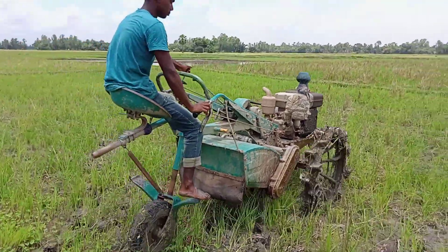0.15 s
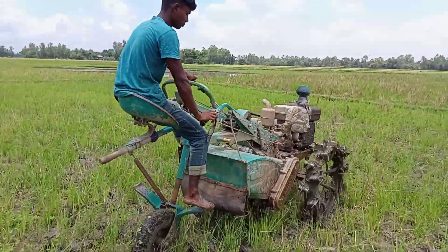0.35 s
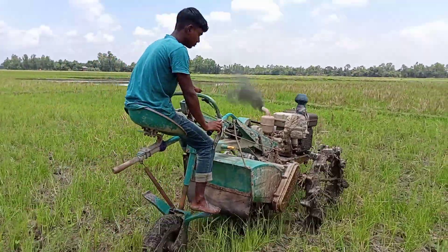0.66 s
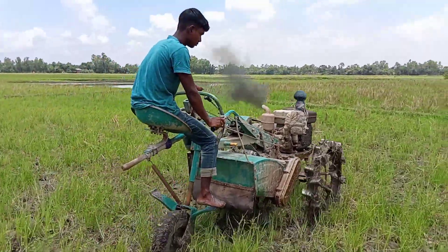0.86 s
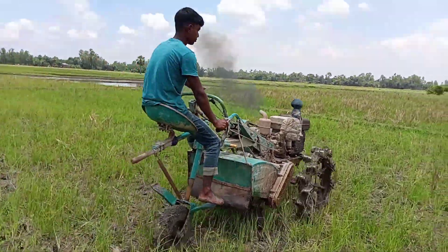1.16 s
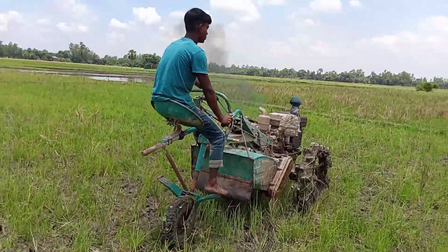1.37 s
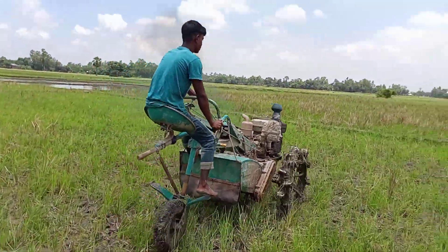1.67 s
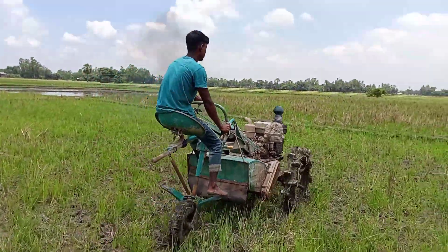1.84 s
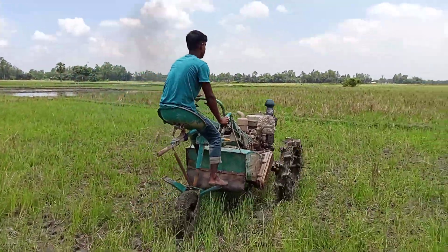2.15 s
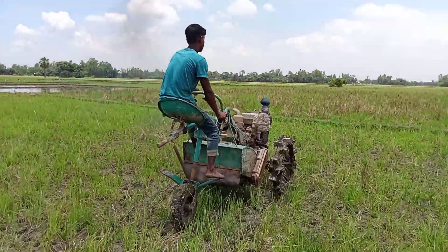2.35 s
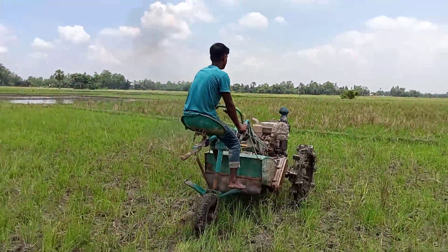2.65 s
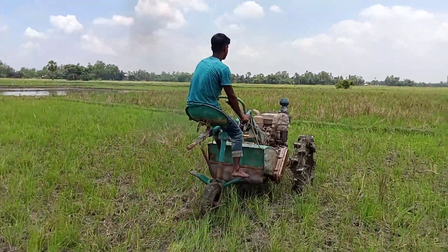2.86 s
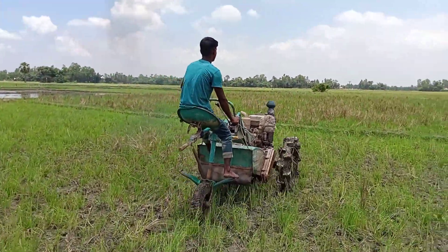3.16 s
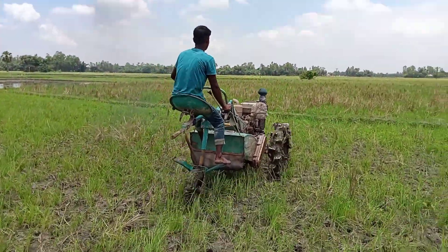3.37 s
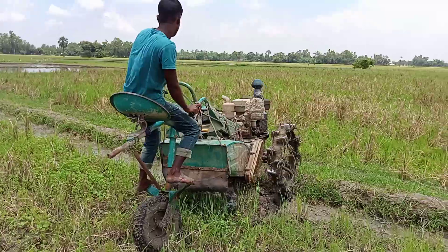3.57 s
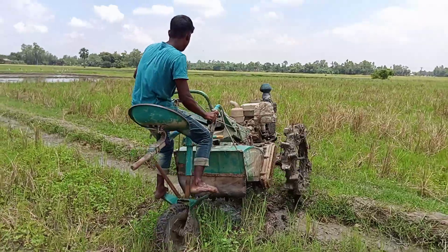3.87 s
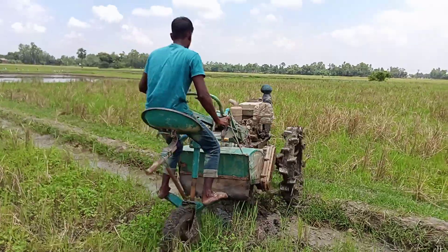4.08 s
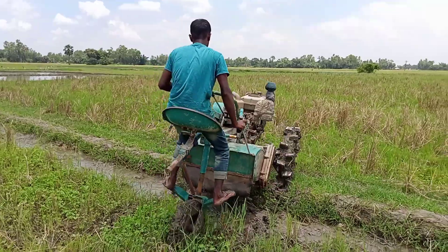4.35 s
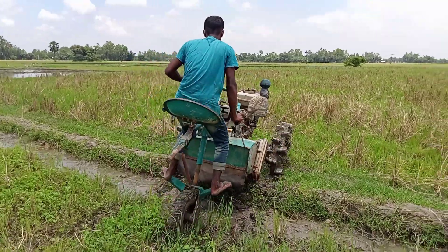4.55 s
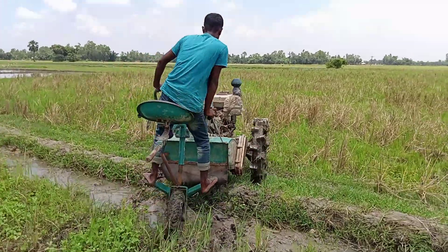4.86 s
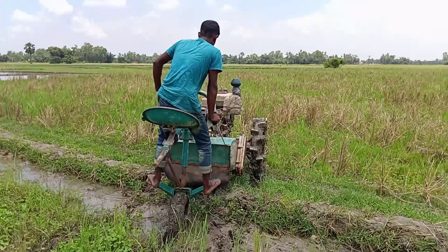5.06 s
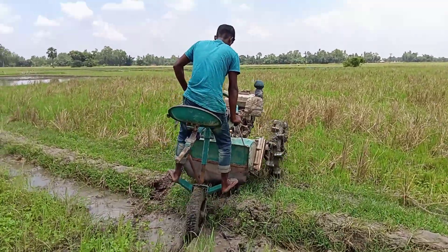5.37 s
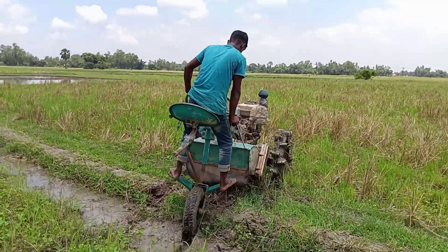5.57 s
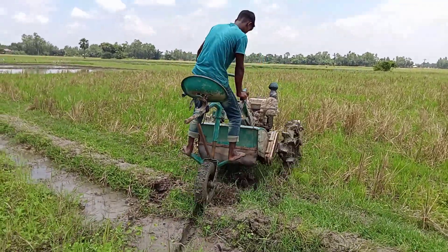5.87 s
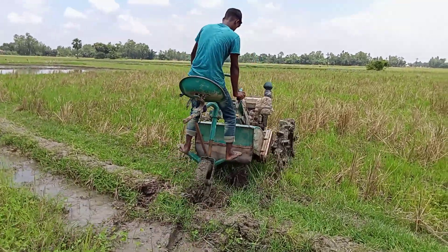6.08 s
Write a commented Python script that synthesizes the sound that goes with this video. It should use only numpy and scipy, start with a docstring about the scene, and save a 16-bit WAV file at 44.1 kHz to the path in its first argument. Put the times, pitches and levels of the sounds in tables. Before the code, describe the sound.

Outdoors on farmland, a diesel tiller chugs rapidly with barking exhaust, bright combustion cracks, valve clicks and lumpy metal clatter. A few early firings leave fuller hollow notes in the pipe. The noise softens as the machine is heard from behind, cuts to nothing halfway, and returns as a slower, heavier chug with uneven knocks and less rattle. Dry, close, mono sound from a small handheld-type microphone with thin deep bass.

```python
"""A single-cylinder diesel tiller chugs away, about ten firings a second, then about eight.
Each firing thumps in the exhaust pipe as decaying sine tones and knocks in the block as a noisy shudder
that rings its tones. Noise bursts make the cracks and clicks of firings and valve gear, and shaped noise
makes the rattle of panels and gears, which ebbs late in the cycle, and the rumble of exhaust flow.
The sound cuts out for a quarter second midway."""
import sys
import numpy as np
from scipy import signal
from scipy.fft import rfft, irfft, next_fast_len
from scipy.io import wavfile
from scipy.ndimage import uniform_filter1d, minimum_filter1d, map_coordinates

SR = 44100
rng = np.random.default_rng(int(sys.argv[2]) if len(sys.argv) > 2 else 0)


def dump_mix(stems):
    """Bounce the given channels to the path in sys.argv[1] as a 16-bit WAV at rate SR."""
    frames = np.atleast_2d(stems).T  # one column per channel
    limited = np.clip(frames, -1, 1)  # hard clip at full scale
    pcm = np.round(limited * 32767).astype(np.int16)
    wavfile.write(sys.argv[1], SR, pcm)


N = 274302
LEAD = SR // 4  # samples kept before the start, for cycles already under way

# How the engine runs. Each row: time in seconds, base rattle level in dB, base exhaust thump level in dB,
# hardness of combustion in dB, view (0 side, 1 rear, 2 and above far rear), rumble over the rattle in dB,
# bark of the upper pipe tones in dB.
RUNNING = [(0, -19.5, -25, -3.5, 0.49, -15, 9.5), (.35, -19, -29, -9.5, 0.26, -16, 17),
           (.5, -17, -28.5, 0.5, 0.19, -12, 8), (1.1, -17, -21, -0.5, 0.14, -14, 10),
           (1.2, -18, -25, -15.5, 0.21, -8.5, 8), (1.7, -19, -25.5, -13, 0.358, -12, 0),
           (2.4, -22, -26.5, -18, 0.17, -9, -0.5), (3.2, -21, -26, -15, 0.22, -6, -10),
           (3.469, -21.5, -24.5, -27, 0.75, -11, -3.5), (4.2, -22, -22, -12, 1.37, -10, -4),
           (4.6, -25.5, -27.5, -23, 1.04, -7.5, 6), (5, -25, -24, -20, 1.07, -6.5, -8),
           (5.6, -24.5, -25.5, -15, 1.65, -18.5, 8.5), (5.9, -23.5, -23, -13.5, 1.93, -5.5, -9),
           (6.22, -26.5, -23, -12, 2.9, -9, -1)]
# Engine speed, one list before the cut and one after, each from its first firing.
# Each row: time in seconds, firings per second.
SPEED = [
    [(-.0345, 8.8), (.3, 9.04), (.6, 9.731), (1.25, 11.102), (1.9, 10.688), (2.5, 10.374), (3.23, 10.18)],
    [(3.406, 8.31), (3.45, 8.31), (4.2, 8.14), (4.6, 8.21), (5.3, 8.4), (5.8, 8.03), (6.26, 8.13)],
]
# Single firings that come harder than their neighbours. Each row: time in seconds, extra hardness in dB.
HARD_FIRINGS = [(1.474, 6.5), (2.311, 9), (2.408, 8.5), (2.793, 6), (2.891, 9.5), (3.889, 5), (4.012, 6.5),
                (4.987, 9), (5.226, 7), (5.71, 4.5), (6.081, 7)]

# Tones of the exhaust pipe. Each row: pitch in Hz, relative level in dB, time to fade by 60 dB in seconds,
# share of the bark from 0 to 1.
PIPE = [(81, 2, 0.083, 0.1), (99.6, -2.5, 0.066, 0), (114.5, -11, 0.1, 0.4), (146, -2.5, 0.1, 0.7),
        (209.3, -6.5, 0.11, 0.97), (279, -5, 0.033, 0.5)]
# Firings that sound one fuller note in the pipe. Each row: start in seconds, starting pitch in Hz, level in dB.
NOTES = [(0.919, 150, -19.5), (1.199, 150, -14), (1.379, 210.7, -17), (1.745, 204, -16), (1.865, 132, -18)]
PIPE_GAIN_DB, PUFF_DB = 5.5, -9.5  # added to every thump; second puff over the thump
NOTE_T60_S, NOTE_RISE = 0.24, 0.11  # fade by 60 dB; a note climbs by this share in that time

# Tones of the engine block and covers when knocked. Each row: pitch in Hz, relative level in dB from the side,
# from the rear, from the far rear, time to fade by 60 dB in seconds.
BLOCK = [(894, -24, 5, -5, 0.083), (1026, -18, -2, -9, 0.11), (1823, -4, 2, 4, 0.036),
         (2299, 5.5, 4, -22, 0.037), (2730, 6.5, 5.5, 6.5, 0.025), (3090, 10.5, -8, 21, 0.023),
         (3214, -1, 3.5, 6, 0.04), (3440, 0.5, 10.5, -23, 0.035), (3787, -6.5, -6.5, 6.5, 0.055),
         (4330, -12, -26, -19, 0.018)]
# Clicks and knocks of each cycle: the firing's own click first, then the valve gear. Each row: share of the
# cycle, relative click level in dB from the side, from behind, relative knock level in dB.
CYCLE_CLICKS = [(.01, -2.5, 6.5, -22.5), (.27, 3, 4, -7.5), (0.549, 1, 1.5, -12), (.79, -1.5, -6.5, 0.5)]
# Single louder clanks of loose parts. Each row: time in seconds, # knock level in dB.
LOUD_KNOCKS = [(1.1787, -9.5), (1.2241, -12), (3.5009, -12), (4.8404, -13.5), (5.8545, -10),
               (5.9797, -11.5), (6.1017, -19), (6.1833, -16)]
# Colour of the combustion crack. Each row: pitch in Hz, relative level in dB per Hz.
CRACK = [(3500, -23), (5450, -11.5), (7500, -0.5), (8400, -8.5), (9800, -34)]
# Colour of the top edge of a hard crack. Each row: pitch in Hz, relative level in dB per Hz.
FIZZ = [(7000, -14.5), (9000, -2), (10200, -15), (11500, -6.5), (12600, -10.5), (14500, -8.5)]
# Colour of the treble in each cycle's clicks. Each row: pitch in Hz, relative level in dB per Hz.
CLICK = [(3500, -10.5), (5200, 0), (7300, 2.5), (8600, -6.5), (10300, -19.5), (12300, -17), (14000, -8)]
CRACK_DB, KNOCK_DB = -31, -1.5  # strength when the hardness is 0 dB
KNOCK_FOLLOWS, CLICK_FOLLOWS = 0.54, 0.24  # knock and click dB per dB of hardness
THUMP_SCATTER_DB, HARDNESS_SCATTER_DB, KNOCK_SCATTER_DB = 0.5, 2, 0.47  # from firing to firing
LATE_KNOCK_S = .006  # the knock comes this much later at full hardness
TAP_DB = 9  # added to every knock of the CYCLE_CLICKS rows
# The next three each hold a side, rear and far rear value:
CLICK_DB = -21, -14, -29  # base level of the clicks over the rattle
REBOUND_DB = 5.5, 5, 11  # base level of the rebound over the rattle
REBOUND_S = .024, .02, 0.018  # rebound after the firing

# Swell over one cycle. Each row: share of the cycle, rattle swell in dB before its depth is applied,
# rumble swell in dB.
SWELL = [(0, -3.5, 5), (.15, -2, 3), (.3, -1, 3.5), (.6, -3, 1), (.76, -3.5, 0), (.82, -2, 4), (.93, 0, 3),
         (1, -1, 3)]
# Ringing of casing and panels. Each row: pitch in Hz, width in Hz, strength in dB against the broad colour
# from the side, from the rear, from the far rear.
CASING = [(761, 13, -3, -1, -11), (2744, 51, -1.5, -35, -27), (7260, 250, -9.5, -9, -2)]
# Metal heard from the side. Each row: pitch in Hz, relative level in dB per Hz.
SIDE_VIEW = [(250, -24), (455, -0.5), (870, 0.5), (1300, -3), (2000, -3.5), (3240, 1), (4600, -11.5),
             (5430, -35), (7400, -30.5), (10000, -53), (12600, -75.5), (14500, -44)]
# Metal heard from behind. Each row: pitch in Hz, relative level in dB per Hz.
REAR_VIEW = [(250, -2.5), (420, -2), (1000, 3), (1560, -5), (2900, -4), (3350, 1.5), (4500, -16.5),
             (5150, -25), (7100, -23), (9700, -49), (12300, -40), (13800, -45.5)]
# Metal heard from further behind. Each row: pitch in Hz, relative level in dB per Hz.
FAR_VIEW = [(250, -20), (700, -5), (1430, -12), (2740, -12), (3130, -7.5), (4500, -22), (5160, -34.5),
            (7200, -34.5), (9500, -49.5), (12300, -46.5), (14000, -45)]
# A hollow panel that rings with the rattle. Each row: time in seconds, level over the rattle in dB.
HOLLOW = [(0, -7), (.5, -18.5), (.9, -15.5), (1.15, -17), (1.7, -16.5), (2.5, -14.5), (2.7, -14),
          (3.2, -15), (3.75, -15), (4.1, -18), (4.8, -12.5), (6.22, -23)]
# A cover plate that rings with the rattle. Each row: time in seconds, centre pitch in Hz,
# level over the rattle in dB.
PLATE = [(0, 3010, -2), (1.1, 3270, -14), (3.2, 3250, -18), (3.5, 3410, -11), (4.4, 3315, -3.5),
         (4.7, 3340, -8.5), (5.4, 3300, -5), (6.22, 3090, -6)]
SWELL_DEPTH = 0.98, 1.25, 1.23  # depth of the rattle's swell from the side, rear and far rear
HARD_SWELL = 0.79  # added to that depth at full hardness
HOLLOW_HZ, HOLLOW_WIDTH_HZ = 882, 24
PLATE_WIDTH_HZ, PLATE_SWELLS = 330, 2.9  # plate swell in dB per dB of rattle swell
TREBLE_HZ, TREBLE_SWELLS = 4760, 0.92  # above this the rattle swells further, dB per dB

# Colour of exhaust flow and frame shake. Each row: pitch in Hz, relative level in dB per Hz.
RUMBLE = [(40, -30), (70, -15.5), (114, 4), (150, 1.5), (180, -6.5), (218, 3), (273, -8), (325, -1.5),
          (420, -13), (650, -27), (1100, -120)]
BARK_HZ, FLOW_BARKS = 179.5, 0.55  # the flow above this follows the bark, dB per dB

MIC_HZ, TOP_HZ = 60.9, 15450  # bass edge of the microphone; top of the treble
SILENCE_FROM_S, SILENCE_TO_S = 3.2066, 3.4648


def amp(db):
    """Turn decibels into a plain factor."""
    return 10 ** (np.asarray(db) / 20)


def unit(x):
    """Scale x to an average strength (RMS) of one."""
    return x / np.sqrt(np.mean(x ** 2) + 1e-20)


def along(points, hz):
    """Read a curve of (Hz, value) points on a log pitch axis."""
    f, v = np.transpose(points)
    return np.interp(np.log(hz + 1), np.log(f + 1), v)


def curves(rows, at):
    """Read each column after the first at the given places."""
    place, *columns = np.transpose(rows)
    return [np.interp(at, place, column) for column in columns]


def wobble(rate):
    """A smooth random curve with this many random points a second."""
    points = rng.standard_normal(int(N * rate / SR) + 4)
    return map_coordinates(points, [np.arange(N) * rate / SR])


def coloured(x, gain):
    """Filter x by a gain of frequency, scaled to keep the power of white noise."""
    m = next_fast_len(N + 8192)
    g = gain(np.fft.rfftfreq(m, 1 / SR))
    return irfft(rfft(x, m) * unit(g), m)[:N]


def patchy(x, depth_db, bins, frames):
    """Give x random patches of gain: other parts ring up from moment to moment."""
    z = signal.stft(x, nperseg=1024)[2]
    field = uniform_filter1d(rng.standard_normal(z.shape), size=bins, axis=0)
    field = uniform_filter1d(field, size=frames, axis=1)
    return signal.istft(z * unit(amp(depth_db * unit(field))), nperseg=1024)[1][:N]


def views(turn):
    """Blending weights of the side, rear and far rear views."""
    return np.clip(1 - np.abs(np.clip(turn, 0, 2) - np.arange(3)[:, None]), 0, 1)


def cycles():
    """Add up engine speed to get each cycle's start and length, and the share passed at each sample."""
    start = []
    for rows in SPEED:
        t = np.arange(rows[0][0], rows[-1][0], 1 / SR)
        turned = np.cumsum(curves(rows, t)[0]) / SR
        firings = np.arange(int(turned[-1]) + 1)
        start = np.append(start, np.interp(firings, turned, t))
    gap = np.diff(start)
    # the shortest of neighbouring gaps
    length = minimum_filter1d(np.append(gap, gap[-1]), size=3)
    now = np.arange(N) / SR
    k = np.searchsorted(start, now, "right") - 1
    return start, length, np.minimum((now - start[k]) / length[k], 1)


def exhaust():
    """Each firing, and a weaker puff a third of a cycle later, rings the pipe, suction first."""
    start, length, _ = cycles()
    _, thump_db, *_, bark_db = curves(RUNNING, start)
    thump_db = thump_db + THUMP_SCATTER_DB * rng.standard_normal(len(start))
    out, t = np.zeros(N + 3 * LEAD), np.arange(LEAD) / SR
    onset = 1 - np.exp(-t / 0.0016)
    for s, cycle, first_db, bark in zip(start, length, thump_db, bark_db):
        for when, db in (s, first_db), (s + .34 * cycle, first_db + PUFF_DB):
            ring = 0
            for hz, level_db, t60, share in PIPE:
                tone_db = level_db + share * (bark + rng.normal(0, 0.89))
                ring = ring + amp(tone_db - 60 * t / t60) * np.sin(2 * np.pi * hz * t)
            out[round(when * SR) + LEAD:][:LEAD] -= amp(db + PIPE_GAIN_DB) * ring * onset
    return out[LEAD:LEAD + N]


def notes():
    """Some firings leave a fuller, slightly climbing note in the pipe."""
    out, t = np.zeros(N), np.arange(LEAD) / SR
    for s, hz, db in NOTES:
        pitch = hz * (1 + NOTE_RISE * t / NOTE_T60_S)
        envelope = amp(db - 60 * t / NOTE_T60_S) * (1 - np.exp(-t / 0.0066))
        out[round(s * SR):][:LEAD] -= envelope * np.sin(2 * np.pi * np.cumsum(pitch) / SR)
    return out


def knocks(times, dbs, t60, rise):
    """Each knock is a short noisy shudder that rings the block's tones at new strengths."""
    out, t = np.zeros(N + 3 * LEAD), np.arange(SR // 10) / SR
    hz, *view_db, decay = np.transpose(BLOCK)
    turn = curves(RUNNING, times)[3]
    levels = views(turn).T @ view_db + 2 * rng.standard_normal((len(times), len(hz)))
    modes = amp(-60 * t / decay[:, None]) * np.sin(2 * np.pi * hz[:, None] * t)
    envelope = amp(-60 * t / t60) * (1 - np.exp(-t / rise))
    for s, db, level in zip(times, dbs, levels):
        ring = amp(level) @ modes
        shudder = envelope * rng.standard_normal(len(t))
        knock = signal.fftconvolve(shudder, ring / np.linalg.norm(ring))
        out[round(s * SR) + LEAD:][:len(knock)] += amp(db) * knock
    # the knocks fall silent above about 4.9 kHz
    return signal.sosfilt(signal.butter(8, 4900, fs=SR, output="sos"), out[LEAD:LEAD + N])


def bursts(times, dbs, t60, rise, colour):
    """Coloured noise under one quick rise and decay for each given time."""
    t = np.arange(SR // 10) / SR
    at = np.round(times * SR).astype(int) + LEAD
    hits = np.bincount(at, amp(dbs) ** 2, N + 2 * LEAD)
    shape = amp(-60 * t / t60) * (1 - np.exp(-t / rise))
    power = signal.fftconvolve(hits, shape ** 2)[LEAD:LEAD + N]
    noise = np.sqrt(np.abs(power)) * rng.standard_normal(N)
    return coloured(noise, lambda hz: amp(along(colour, hz)))


def combustion():
    """Each firing knocks the block, rebounds a moment later and cracks in the treble."""
    start = cycles()[0]
    rattle_db, _, hard_db, turn, *_ = curves(RUNNING, start)
    # full load fires evenly, softer running varies more
    unevenness = np.clip(.3 - hard_db / 10, 0, 1)
    chance = rng.standard_normal((len(start), 2)) * unevenness[:, None]
    hard_db = hard_db + HARDNESS_SCATTER_DB * chance[:, 0]
    for s, extra_db in HARD_FIRINGS:
        hard_db[np.argmin(np.abs(start - s))] += extra_db

    knock_at = start - .004 + LATE_KNOCK_S * np.minimum(amp(hard_db), 1)
    knock_db = KNOCK_DB + KNOCK_FOLLOWS * hard_db + KNOCK_SCATTER_DB * chance[:, 1]
    knock = knocks(knock_at, knock_db, t60=0.039, rise=0.0034)
    rebound_db = rattle_db + REBOUND_DB @ views(turn) + chance[:, 1]
    rebound = knocks(start + REBOUND_S @ views(turn), rebound_db, t60=0.054, rise=0.004)

    crack_db = CRACK_DB + hard_db
    crack = bursts(start - .001, crack_db, t60=0.12, rise=0.002, colour=CRACK)
    # a harder crack is brighter: its top edge grows twice as fast in dB
    fizz = bursts(start, 2 * crack_db + 29, t60=0.059, rise=.002, colour=FIZZ)
    return knock + rebound + crack + fizz


def cycle_clicks():
    """Clicks and knocks of each cycle: the firing's own click first, then the valve gear."""
    start, length, _ = cycles()
    rattle_db, _, hard_db, turn, *_ = curves(RUNNING, start)
    share, side_db, behind_db, tap_db = np.transpose(CYCLE_CLICKS)
    shape = len(start), len(share)
    jitter, scatter = rng.standard_normal(shape), rng.standard_normal(shape)
    click_at = (start[:, None] + share * length[:, None] + .001 * jitter).ravel()

    tap_db = rattle_db[:, None] + tap_db + TAP_DB + 1.2 * scatter
    tap = knocks(click_at - .003, tap_db.ravel(), t60=0.023, rise=0.004)

    base_db = rattle_db + CLICK_DB @ views(turn) + CLICK_FOLLOWS * hard_db
    click_db = side_db + (behind_db - side_db) * np.clip(turn, 0, 1)[:, None]
    click_db = base_db[:, None] + click_db + 2.1 * scatter
    return tap + bursts(click_at, click_db.ravel(), t60=0.047, rise=0.0017, colour=CLICK)


def loud_knocks():
    """Loose parts clank now and then, ringing the block's tones."""
    return knocks(*np.transpose(LOUD_KNOCKS), t60=.03, rise=.001)


def rattle():
    """Loose panels and gears shake the casing; its colour turns with the view of the machine."""
    now = np.arange(N) / SR
    rattle_db, _, hard_db, turn, *_ = curves(RUNNING, now)
    # loose parts strike in quick uneven clusters, so the rattle is lumpy
    lumps = unit(amp(1.67 * wobble(150) + 1.1 * wobble(30)) * rng.standard_normal(N))
    depth = SWELL_DEPTH @ views(turn) + HARD_SWELL * amp(hard_db)
    swell_db = depth * curves(SWELL, cycles()[2])[0]
    drive = amp(rattle_db + swell_db) * patchy(lumps, depth_db=3, bins=3, frames=4)

    metal = 0
    for k, (view, weight) in enumerate(zip((SIDE_VIEW, REAR_VIEW, FAR_VIEW), views(turn))):
        metal = metal + weight * coloured(drive, lambda hz: amp(along(view, hz)) * casing(hz, k))
    metal = metal + plate(rattle_db + PLATE_SWELLS * swell_db)
    high_pass = signal.butter(4, TREBLE_HZ, "high", fs=SR, output="sos")
    treble = signal.sosfiltfilt(high_pass, metal)
    metal = metal + (amp(TREBLE_SWELLS * swell_db) - 1) * treble
    return metal + hollow_panel(amp(rattle_db + 0.2 * swell_db) * lumps)


def casing(f, k):
    """Gain of the casing's resonances in view k, each a peak over the broad colour."""
    gain = 1
    for centre, width, *view_db in CASING:
        gain = gain + amp(view_db[k]) * f * width / np.hypot(centre ** 2 - f ** 2, f * width)
    return np.abs(gain)


def hollow_panel(drive):
    """A hollow panel answers the rattle in a narrow band around one pitch."""
    ring = coloured(drive, lambda f: 1 / np.hypot(1, 2 * (f - HOLLOW_HZ) / HOLLOW_WIDTH_HZ))
    return amp(curves(HOLLOW, np.arange(N) / SR)[0]) * ring


def plate(level_db):
    """A cover plate rings as a narrow band of lumpy noise around a moving centre pitch."""
    centre_hz, over_db = curves(PLATE, np.arange(N) / SR)
    # two slow noises, carried up to the centre pitch by a cosine and a sine
    slow = [coloured(rng.standard_normal(N), lambda f: 1 / (1 + (2 * f / PLATE_WIDTH_HZ) ** 4))
            for _ in range(2)]
    phase = 2 * np.pi * np.cumsum(centre_hz) / SR
    band = slow[0] * np.cos(phase) + slow[1] * np.sin(phase)
    return amp(level_db + over_db + 1.8 * wobble(60)) * band


def flow():
    """Turbulent exhaust flow and frame shake rumble as gusty noise, swelling with the cycle."""
    rattle_db, *_, over_db, bark_db = curves(RUNNING, np.arange(N) / SR)
    rumble_db = rattle_db + over_db + curves(SWELL, cycles()[2])[1]
    noise = coloured(rng.standard_normal(N), lambda hz: amp(along(RUMBLE, hz)))
    gusty = unit(amp(1.8 * wobble(40)) * noise)
    low = signal.sosfiltfilt(signal.butter(3, BARK_HZ, fs=SR, output="sos"), gusty)
    return amp(rumble_db) * (low + amp(FLOW_BARKS * bark_db) * (gusty - low))


def scene():
    """Add up the whole machine as one channel."""
    engine = exhaust() + notes() + combustion() + cycle_clicks() + loud_knocks()
    return (engine + rattle() + flow())[None]


def record(dry):
    """A small microphone loses the deep bass; the sound cuts out for a moment and the top treble is removed."""
    now = np.arange(N) / SR
    heard = signal.sosfilt(signal.butter(4, MIC_HZ, "high", fs=SR, output="sos"), dry)
    heard = heard * ((now < SILENCE_FROM_S) | (now > SILENCE_TO_S))
    return signal.sosfilt(signal.ellip(14, .2, 80, TOP_HZ, fs=SR, output="sos"), heard)


dry = scene()
out = record(dry)
dump_mix(out)
```